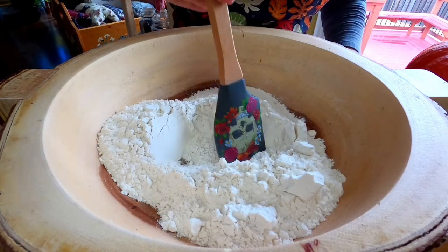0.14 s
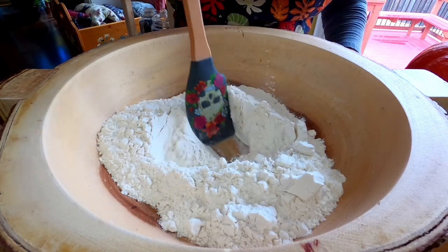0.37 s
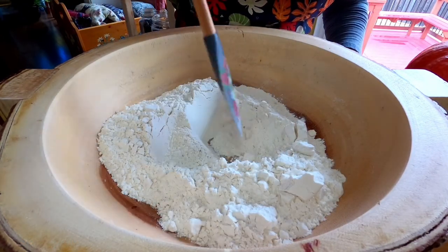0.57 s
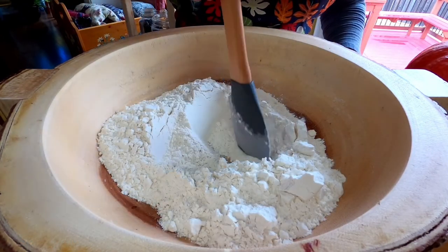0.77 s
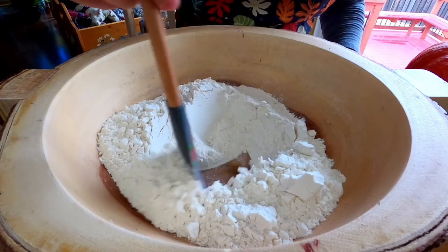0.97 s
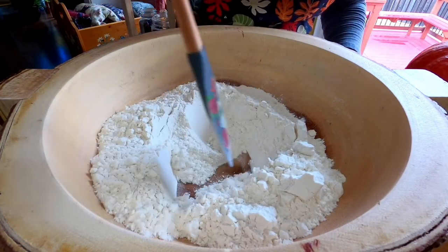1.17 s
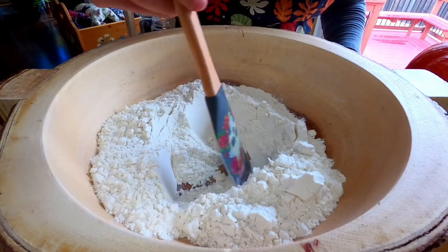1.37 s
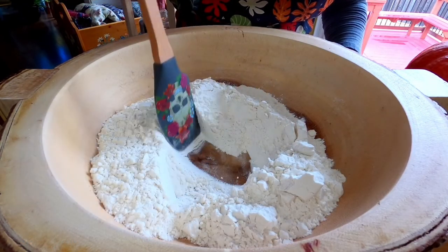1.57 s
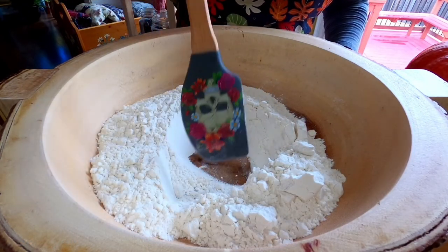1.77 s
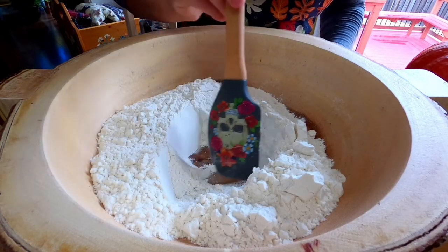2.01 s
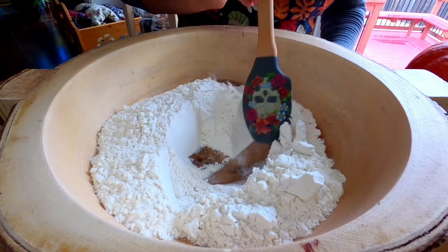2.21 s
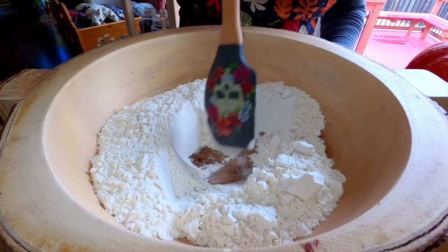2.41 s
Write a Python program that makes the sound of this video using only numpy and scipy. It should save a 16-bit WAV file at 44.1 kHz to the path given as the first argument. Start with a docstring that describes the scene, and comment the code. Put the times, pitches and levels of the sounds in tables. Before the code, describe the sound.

Short gritty strokes of a flexible spatula stir flour in a wide wooden bowl, indoors

```python
"""A soft thud rocks a wide wooden bowl, then a silicone spatula drags through dry flour, close by in a quiet kitchen.
Thuds are swelling low sines and rumble; taps of the edge on wood are short noise cracks with damped rings.
The drag is dense random clicks, mostly brightening as the blade gathers speed, with a gliding hollow resonance.
Loose flour trickles back as faint swells of hiss; a short diffuse tail and steady room tone surround it all."""
import sys
import numpy as np
from scipy import signal
from scipy.fft import rfft, irfft
from scipy.io import wavfile
from scipy.ndimage import uniform_filter1d

SR = 44100
rng = np.random.default_rng(int(sys.argv[2]) if len(sys.argv) > 2 else 0)


def unload_wav(signal):
    """Save mono or channel-first audio to the path in sys.argv[1] as 16-bit WAV at rate SR, clipped to [-1, 1]."""
    wavfile.write(
        sys.argv[1],
        SR,
        np.round(np.clip(np.atleast_2d(signal).T, -1, 1) * 32767).astype(np.int16),
    )


N = 108045
T = np.arange(N) / SR  # s
HZ = np.maximum(np.arange(N // 2 + 1) * SR / N, 1)  # spectrum bins, kept above zero for logarithms
WINDOW, HOP = 512, 128  # short-time spectrum, samples

# left-right likeness of everything at the bowl: (frequency [Hz], correlation [-1..1])
NEAR_LIKENESS = [(100, 0.95), (300, 0.94), (640, 0.77), (1400, 0.98), (3100, 0.76), (7000, 0.61),
                 (14000, 0.22)]


def from_db(db):
    """Decibels to amplitude gain."""
    return 10 ** (np.asarray(db) / 20)


def rms_one(x):
    """Scale to unit power."""
    return x / np.sqrt(np.mean(x ** 2) + 1e-20)


def at_hz(points):
    """Read a table along log frequency."""
    hz, value = np.transpose(points)
    return np.interp(np.log(HZ), np.log(hz), value)


def white():
    """Two unrelated white noises."""
    return rng.standard_normal((2, N))


def lowpassed(x, order, cutoff_hz):
    """Butterworth low-pass: smooths away everything fast."""
    return signal.sosfilt(signal.butter(order, cutoff_hz, fs=SR, output="sos"), x)


def colour(pair, spectrum, likeness):
    """Shape two unrelated signals, then mix them as mid and side for the wanted stereo likeness; rms 1."""
    mid, side = rfft(pair) * from_db(at_hz(spectrum))
    alike = np.clip(at_hz(likeness), -.999, .999)
    mid = np.sqrt(1 + alike) * mid
    side = np.sqrt(1 - alike) * side
    return rms_one(irfft(mid + side * [[1], [-1]], N))


def ramp(u):
    """Smooth step from 0 to 1."""
    return np.sin(np.pi / 2 * np.clip(u, 0, 1)) ** 2


def swell(age, peak_s, steepness):
    """Builds up to 1 at peak_s, then dies away."""
    u = np.maximum(age, 0) / peak_s
    return (u * np.exp(1 - u)) ** steepness


def room_tone():
    """Steady, wide background noise, heaviest in the bass."""
    # tone of the room: (frequency [Hz], relative level [dB])
    air = [(20, 4), (45, -9.5), (70, 1), (95, -28), (115, -16.5), (140, 2), (200, -1.5), (235, 3.5),
           (330, -8.5), (450, -2), (550, -15.5), (800, -16.5), (1100, -10.5), (1400, -11), (2000, -20.5),
           (3300, -29), (7000, -35.5), (10200, -45.5), (15500, -46)]
    # left-right likeness of the room: (frequency [Hz], correlation [-1..1])
    air_likeness = [(60, 0.86), (180, 0.71), (550, 0.34), (1400, 0.62), (5000, 0), (15000, 0)]
    return from_db(-62.5) * colour(white(), air, air_likeness)


def thuds():
    """A soft landing swells the bowl's low modes; bowl and table shudder and rock afterwards."""
    # landings of the blade: (time [s], thud level [dB], rocking level [dB])
    landings = [(0.2, -28, -41.5), (0.791, -68, -56.5), (.825, -59, -62), (1.403, -40, -56.5),
                (1.931, -49.5, -59), (1.998, -65, -58.5)]
    # low modes of the bowl: (frequency [Hz], level within the thud [dB], time to peak [s], steepness)
    bowl_modes = [(99.7, 1.5, 0.02, 3.6), (209.4, -18.5, 0.014, 0.67)]
    # rumble of the shudder: (frequency [Hz], relative level [dB])
    shudder_spectrum = [(25, -8), (80, -6.5), (200, -13.5), (330, -24.5), (700, -38.5), (2000, -81)]
    shudder_db, shudder_peak_s = -18, 0.037  # level within the thud
    rock_hz, rock_delay_s, rock_peak_s, rock_steepness = 44.1, 0.0314, 0.042, 2.2

    out = 0
    rumble = colour(white(), shudder_spectrum, NEAR_LIKENESS)
    for start, db, rock_db in landings:
        age = T - start
        body = sum(from_db(mode_db) * swell(age, peak_s, steepness) * np.sin(2 * np.pi * hz * age)
                   for hz, mode_db, peak_s, steepness in bowl_modes)
        shudder = from_db(shudder_db) * rumble * swell(age, shudder_peak_s, 0.82)
        rock_age = age - rock_delay_s
        rock = swell(rock_age, rock_peak_s, rock_steepness) * np.sin(2 * np.pi * rock_hz * rock_age)
        out = out + from_db(db) * (body + shudder) + from_db(rock_db) * rock
    return out


def taps():
    """The blade's edge taps bare wood: a short gritty crack and quickly damped modes."""
    # taps: (time [s], ring level [dB], crack level [dB], brightness of the crack [dB per octave])
    edge_taps = [(0.2039, -69.5, -60, -1), (0.2061, -83, -63, 14), (0.2403, -67, -75, 2),
                 (1.9374, -70, -40.5, 1), (1.9403, -47.5, -46, 2.5), (1.9441, -61, -42, -3.5),
                 (2.164, -48, -61, -8)]
    # ringing modes of the wood: (frequency [Hz], level within the ring [dB], time to fall 60 dB [s])
    wood_modes = [(845, -12, 0.035), (1316, -3.5, 0.076), (1770, 3, 0.041), (2220, -15, 0.026),
                  (2520, -8, 0.029), (3820, -5, .03)]
    # grit of the crack before brightening: (frequency [Hz], relative level [dB])
    crack_spectrum = [(300, -15), (800, -3), (1700, 10.5), (4000, -2), (6000, -4), (9000, -23.5),
                      (15000, -50)]
    crack_t60_s, crack_rise_s, ring_rise_s = 0.031, 0.0011, 0.0014

    out = np.zeros((2, N))
    age = T[:SR // 4]
    for start, db, crack_db, bright in edge_taps:
        first = int(start * SR)
        span = slice(first, first + len(age))
        spectrum = [(hz, level + bright * np.log2(hz)) for hz, level in crack_spectrum]
        grit = colour(white(), spectrum, NEAR_LIKENESS)[:, span]
        crack = grit * ramp(age / crack_rise_s) * from_db(crack_db - 60 * age / crack_t60_s)
        ring = 0
        for k, (hz, mode_db, t60_s) in enumerate(wood_modes):
            # each tap excites the modes a little differently; neighbours start in opposite directions
            decay = from_db(mode_db + rng.normal(0, 0.99) - 60 * age / t60_s)
            ring = ring + decay * np.sin(2 * np.pi * hz * age) * (-1) ** k
        out[:, span] += from_db(db) * ring * ramp(age / ring_rise_s) + crack
    return out


def slips():
    """Dense tiny slips of powder under a blade that judders slightly, coloured by the bowl."""
    # peaks and dips from reflections in the bowl: (frequency [Hz], half width [Hz], level [dB])
    bowl_colour = [(1415, 24, 2), (2410, 67, 0), (3170, 66, 2.5), (4510, 77, -3), (5380, 200, 1.5),
                   (5950, 78, 3), (8000, 105, -6), (8130, 400, 0.5)]
    # tone of the scrape: (frequency [Hz], relative level [dB])
    scrape_spectrum = [(180, -21), (300, -4), (480, -9.5), (570, -15.5), (800, -13.5), (1250, -3.5),
                       (1500, -7), (2100, -5), (2500, -6), (3200, -4.5), (5200, -10), (6800, -18),
                       (8700, -17), (10100, -26), (12700, -29), (15500, -42.5)]
    slips_per_s, slip_spread_db = 11000, 2.5  # rate in each of two click streams
    judder_db, judder_hz = 0.5, 68.5  # rms wobble, and its fastest rate

    sizes = from_db(slip_spread_db * np.minimum(rng.exponential(1, (2, N)), 5))
    happens = rng.random((2, N)) < slips_per_s / SR
    clicks = happens * sizes * rng.choice([-1, 1], (2, N))
    bowl_db = sum(db * np.exp(-.5 * ((HZ - hz) / width) ** 2) for hz, width, db in bowl_colour)
    in_bowl = irfft(rfft(clicks) * from_db(bowl_db), N)
    judder = rms_one(lowpassed(rng.standard_normal(N), 2, judder_hz))
    return colour(in_bowl, scrape_spectrum, NEAR_LIKENESS) * from_db(judder_db * judder)


def shifting(shape):
    """Narrow resonances, in dB, come and go at random as the blade moves through the bowl."""
    shift_db, shift_s, shift_hz = 1.14, 0.087, 170  # rms depth, smoothing in time and frequency
    field = rng.standard_normal(shape)
    across = uniform_filter1d(field, max(1, round(shift_hz * WINDOW / SR)), axis=0)
    along = uniform_filter1d(across, max(1, round(shift_s * SR / HOP)), axis=1)
    return shift_db * rms_one(along)


def scraping():
    """Each push swells, changes brightness as it gathers speed and stops; its hollow resonance glides."""
    # pushes of the blade, overlapping where it turns or bears down within a stroke:
    # (start [s], length [s], attack [s], release [s], level [dB], sag [dB per s],
    #  hollow from [Hz], hollow to [Hz], hollow level [dB], dullness at the start [dB per octave],
    #  brightness at speed [dB per octave], low body [dB])
    strokes = [(0.222, 0.27, 0.052, 0.042, -47.5, 28.5, 1150, 1220, 4, 11.5, 1, -6),
               (0.783, 0.084, 0.036, 0.011, -59, -2, 1340, 1350, 4.5, 3, -3, 6.5),
               (0.847, 0.16, 0.043, 0.1, -49, 12, 1430, 1360, 7, 5.5, -0.5, -2),
               (0.882, 0.097, .025, 0.042, -60, 0, 740, 635, 14.5, -2, -1, 8.5),
               (0.924, 0.19, 0.11, 0.042, -52, 6.5, 1850, 2000, 5, -6.5, 0, 3),
               (1.392, 0.054, 0.024, 0.029, -60.5, 0, 1400, 1400, 10, 3.5, -3, 3),
               (1.416, 0.21, .05, 0.05, -50, 17, 2000, 2050, 1.5, 3.5, 2, -3),
               (1.506, 0.066, 0.061, 0.038, -61, 2, 1360, 1360, 21, -2, 7, 18),
               (1.766, 0.13, 0.071, 0.048, -62, 31, 1470, 1460, 10.5, 0.5, -0.5, 15),
               (1.853, 0.22, 0.038, 0.041, -68.5, -4, 1530, 1510, 7, 4, -1.5, 12),
               (1.998, 0.19, .026, 0.059, -47.5, 7, 1710, 1720, 9, 1.5, -1.5, -14.5),
               (2.094, 0.24, 0.037, 0.084, -50.5, 6.5, 1280, 1205, 10.5, -0.5, 0, -2.5)]
    hollow_octaves, body_hz = 0.16, 875  # half width of the hollow, extent of the low body
    speed_up_s, dull_above_hz = 0.067, 1940

    hz, t, frames = signal.stft(slips(), SR, nperseg=WINDOW, noverlap=WINDOW - HOP)
    hz = np.maximum(hz, 1)[:, None]
    treble = np.log2(1 + (hz / dull_above_hz) ** 2) / 2  # far up, octaves above dull_above_hz
    bass = np.exp(-(hz / body_hz) ** 2)
    power = 0
    for (start, length, attack, release, db, sag, from_hz, to_hz,
         hollow_db, dull, bright, body_db) in strokes:
        age = np.clip(t - start, 0, length)
        centre = from_hz + (to_hz - from_hz) * age / length
        hollow = hollow_db * np.exp(-.5 * (np.log2(hz / centre) / hollow_octaves) ** 2)
        slope = bright - dull * np.exp(-(age / speed_up_s) ** 2)
        level = db - sag * age + hollow + slope * treble + body_db * bass
        envelope = ramp(age / attack) * ramp((length - age) / release)
        power = power + (envelope * from_db(level)) ** 2
    shaped = frames * np.sqrt(power) * from_db(shifting(power.shape))
    return signal.istft(shaped, SR, nperseg=WINDOW, noverlap=WINDOW - HOP)[1][:, :N]


def trickles():
    """Faint hiss of loose flour sliding back into the furrow, in smooth swells."""
    # slides of flour: (time of the peak [s], half width [s], level [dB])
    slides = [(.575, 0.027, -76), (.72, 0.13, -71.5), (1.14, .05, -74), (1.70, 0.04, -79),
              (1.86, 0.27, -68), (2.33, 0.047, -70)]
    # tone of the hiss: (frequency [Hz], relative level [dB])
    hiss_spectrum = [(1000, 21), (3000, -8.5), (6500, 3), (9000, -7), (15000, -29)]
    flow = sum(from_db(db) * np.exp(-.5 * ((T - peak) / width) ** 2) for peak, width, db in slides)
    return flow * colour(white(), hiss_spectrum, NEAR_LIKENESS)


def placed(x):
    """The bowl is a little to the right: the left side is later and its top is shaded."""
    # balance of the two sides: (frequency [Hz], left minus right [dB])
    balance = [(60, 1), (300, -2.5), (1200, -2), (2200, 1.5), (3200, 1.1), (4600, -0.5), (6300, 2),
               (8200, -3.5), (9300, -4), (11000, -5), (15000, -8.5)]
    left_lag_s = .000028
    left, right = rfft(x)
    half = from_db(at_hz(balance) / 2)
    lag = np.exp(-2j * np.pi * HZ * left_lag_s)
    return irfft(np.array([left * half * lag, right / half]), N)


def kitchen(x):
    """A short, dull, diffuse tail of decaying noise, different at each ear."""
    t60_s, level_db, cutoff_hz, rise_s = 0.34, -16, 11300, 0.0092
    tail = lowpassed(white(), 1, cutoff_hz) * from_db(-60 * T / t60_s) * ramp(T / rise_s)
    response = rms_one(tail) / np.sqrt(N)  # unit energy at each ear on average
    return from_db(level_db) * signal.fftconvolve(x, response, axes=1)[:, :N]


def scene():
    """Thuds and stirring at the bowl, the room tail of the stirring, and the room tone."""
    air = room_tone()
    landing = thuds()
    blade = taps() + scraping() + trickles()
    return placed(blade + landing) + kitchen(blade) + air


def record(dry):
    """A steep elliptic low-pass removes the very top."""
    cutoff_hz = 15650
    return signal.sosfilt(signal.ellip(12, .1, 80, cutoff_hz, fs=SR, output="sos"), dry)


dry = scene()
out = record(dry)
unload_wav(out)
```